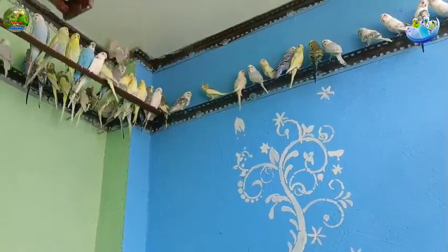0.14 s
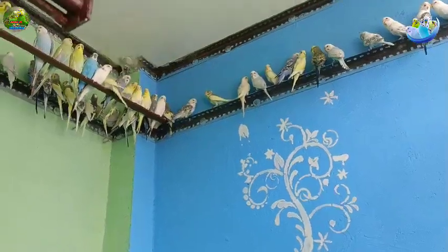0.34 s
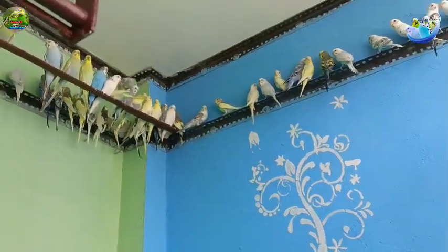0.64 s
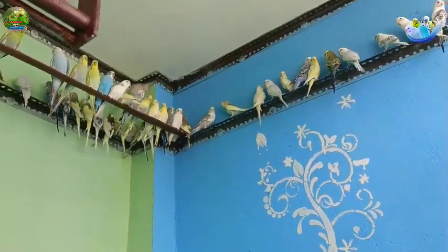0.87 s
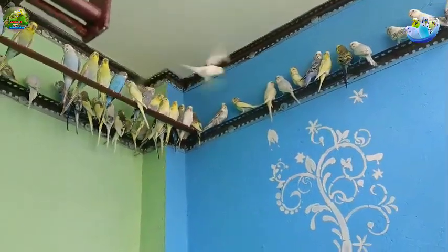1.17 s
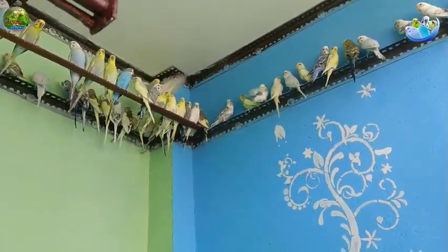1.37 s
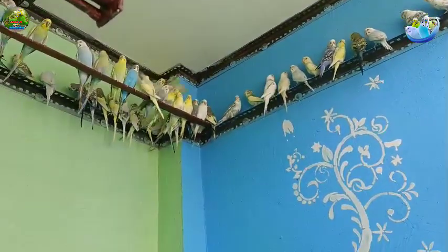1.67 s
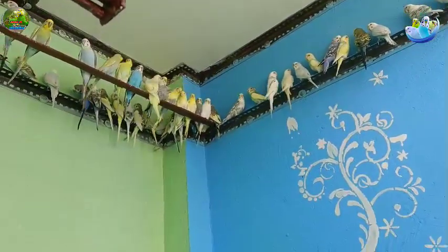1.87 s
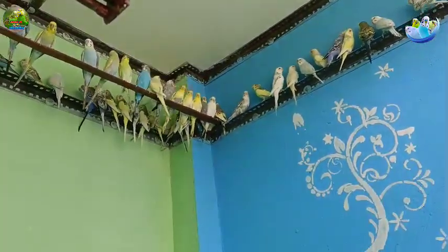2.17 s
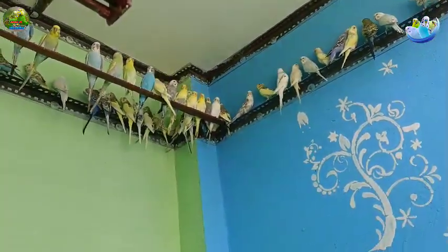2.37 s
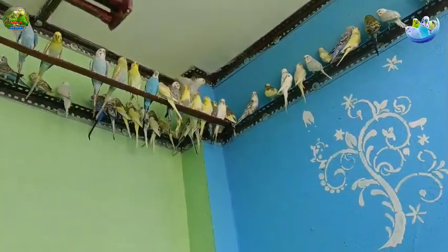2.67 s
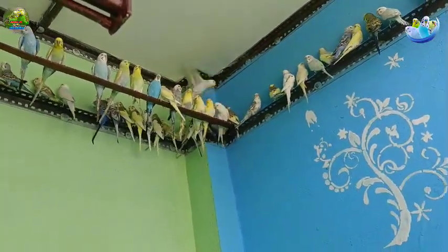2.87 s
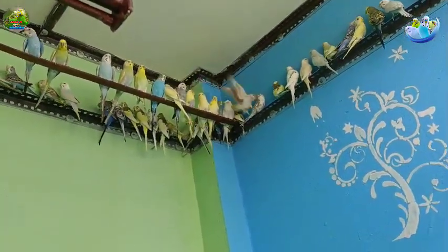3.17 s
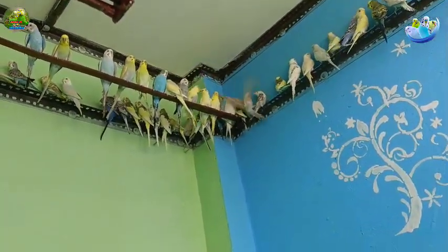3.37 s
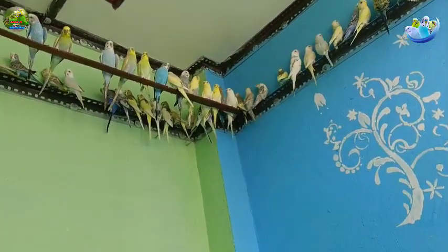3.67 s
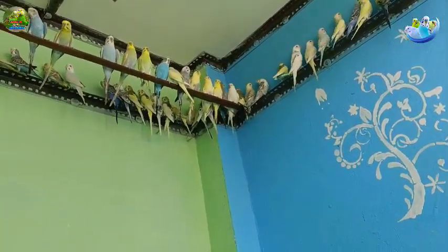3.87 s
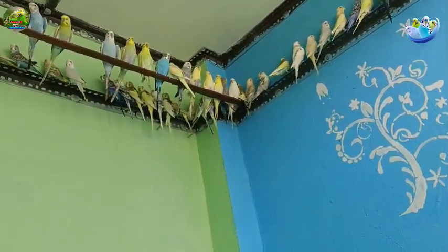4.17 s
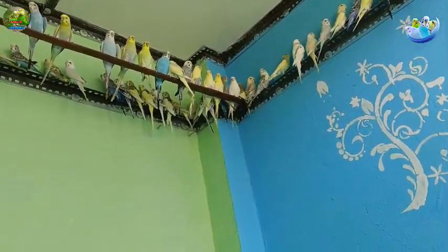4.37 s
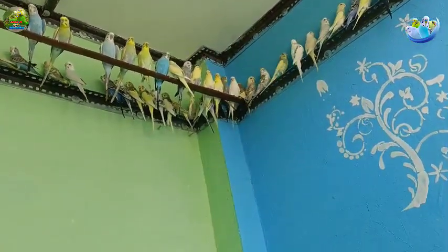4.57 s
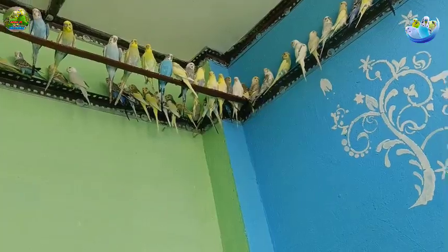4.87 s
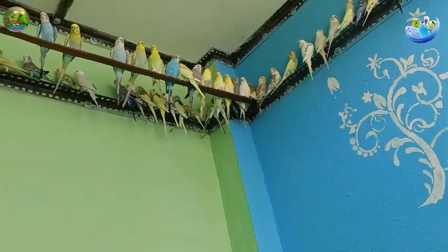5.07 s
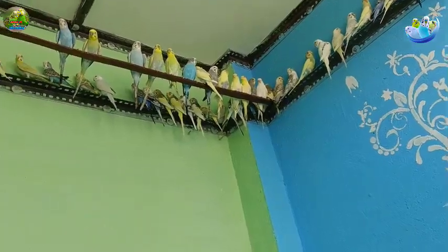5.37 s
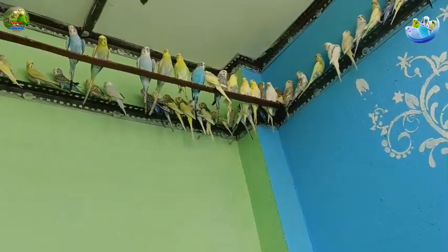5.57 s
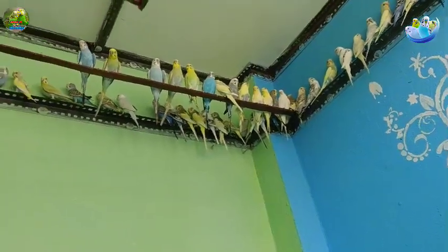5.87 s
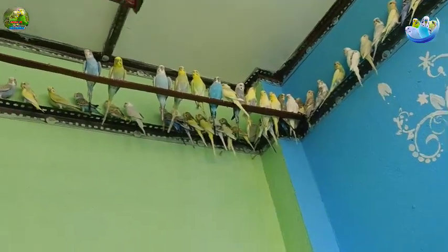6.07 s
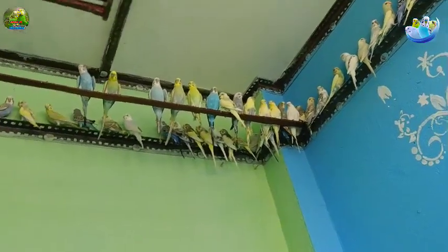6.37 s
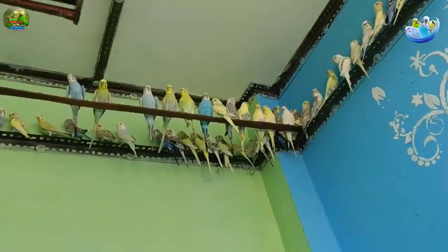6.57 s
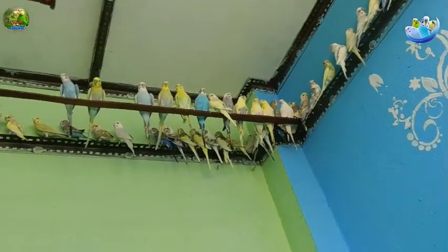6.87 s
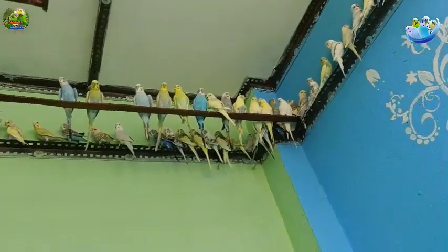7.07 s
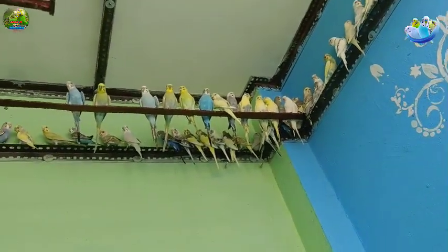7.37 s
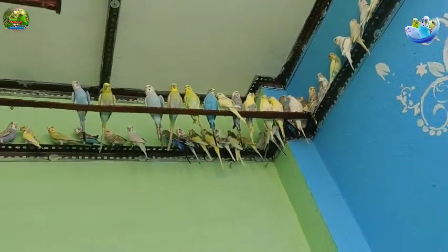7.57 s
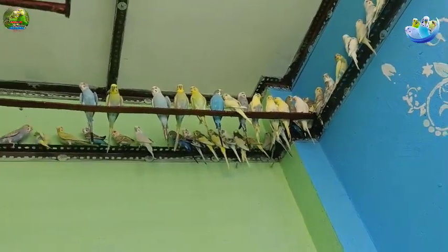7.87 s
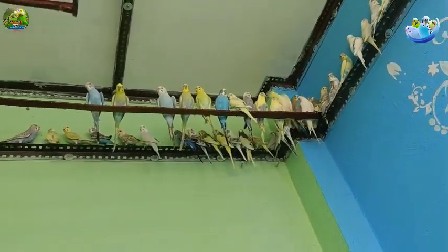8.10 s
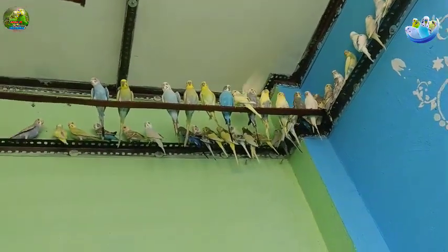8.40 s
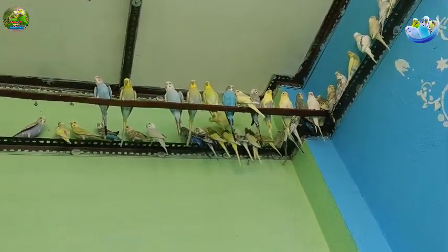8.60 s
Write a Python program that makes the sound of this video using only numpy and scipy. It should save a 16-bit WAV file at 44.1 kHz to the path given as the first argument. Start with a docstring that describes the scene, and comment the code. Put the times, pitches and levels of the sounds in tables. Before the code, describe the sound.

Over constant fan rush with a low wavering hum, a flock of small parrots chatters indoors. Quick raspy squawks and high peeps crowd the opening seconds, then fade into a short lull around four and a half seconds. Sweet but rough whistles, upward hooks and falling chirps follow, with brief squawks near the end. The stereo microphones are fairly close; plaster walls ring briefly around every call.

```python
"""A flock of budgerigars trades chirrups, falling chirps, warbles, hooks and peeps in a small plastered room.
Each whistle is a near sine, roughened by fast modulation of its frequency and amplitude.
Harsh squawks come in runs: uneven pulse trains filtered by a throat resonance.
Faint gliding notes follow many calls, and every call rings in the room.
Beneath lies a steady fan, shaped noise plus wavering tones, that hums on through a short lull."""
import sys
import numpy as np
from scipy import signal
from scipy.fft import rfft, irfft
from scipy.io import wavfile
from scipy.ndimage import uniform_filter1d, minimum_filter1d

SR = 44100
rng = np.random.default_rng(int(sys.argv[2]) if len(sys.argv) > 2 else 0)


def digitize_waveform(pressure):
    """Quantize a signal to 16-bit integers and store it at the path in sys.argv[1].

    Rows of a 2-D input are taken as channels; values are limited to [-1, 1].
    """
    field = np.atleast_2d(pressure).T
    bounded = np.clip(field, -1, 1)
    quanta = np.round(bounded * 32767).astype(np.int16)
    wavfile.write(sys.argv[1], SR, quanta)


N = 385434

# Levels in the tables are relative: gains follow. Roughness is a dimensionless modulation depth.
# Spectrum of the rushing air: f/Hz, spectral level/dB
AIR_SPECTRUM = [(30, -30), (100, -11.5), (150, -10.5), (240, 3), (320, -12), (400, -6), (500, -14.5),
                (650, -5.5), (1000, -12.5), (2300, -13), (4700, -18), (6500, -29.5), (12000, -29.5),
                (15500, -40)]
# Tones of the fan motor: f/Hz, level/dB
MOTOR_TONES = [(43.3, -56.5), (86.6, -53.5), (173.2, -43.5), (235, -53.5), (390, -50), (433, -52),
               (1083, -54.5)]
# Slow swell of the second motor tone: t/s, gain/dB
MOTOR_SWELL = [(0, -11), (3, -4.5), (4.5, 0.5), (6.3, -1), (6.7, 5.5), (7.6, 5.5), (8.7, 3)]
# Reverberation of the bare walls: f/Hz, T60/s
WALL_DECAY = [(1000, 0.12), (3000, 0.26), (6000, 0.22), (14000, 0.17)]
# Left-right balance of the calling birds: t/s, left minus right/dB
BALANCE = [(0.0, -2.5), (0.14, -4.5), (1.8, -0.5), (1.85, -3.5), (2.77, 1), (3.26, -3.5), (3.77, -1.0),
           (3.8, -4), (3.92, -3), (6.38, -1.5), (6.67, -4.5), (6.81, 3), (7.67, -2.5), (7.74, 0.5),
           (8.72, -2.5), (8.74, 0.0)]
# Throat response in a squawk: f/throat resonance (ratio), gain/dB
THROAT_RESPONSE = [(.25, -13.5), (.45, -3.5), (.62, 3), (.72, -3.5), (.83, 13), (1.05, 12), (1.28, 4),
                   (1.45, -8), (1.8, -13), (2.4, -16.5), (3.1, -24)]
# Second to fourth partials of a whistle, before roughness scales them: level/dB
PARTIALS_DB = [-27.5, -39.5, -31]
# Pitched squeals: t/s, level/dB, length/s, throat f/Hz, pitch f/Hz, roughness/1
SQUEALS = [(.898, -26, 0.016, 6530, 1750, 0.36), (2.545, -15.5, 0.063, 5580, 1584, 0.32),
           (2.620, -15.5, 0.041, 5360, 1480, 0.3), (2.696, -8.5, 0.019, 5470, 1485, 0.34),
           (3.765, -34, .1, 6630, 1800, 0.3), (5.315, -32, 0.021, 4080, 1523, 0.23),
           (8.178, -29, 0.015, 5170, 1850, 0.34)]
# Bouts of evenly paced squawks: t/s, bout length/s, rate/(1/s), first level/dB, last level/dB,
# central squawk length/s, central throat f/Hz
SQUAWK_BOUTS = [(0, .03, 14, -21.5, -23, 0.0079, 5150), (0.201, .03, 14, -35, -33.5, 0.02, 4800),
                (0.628, .03, 14, -29, -31.5, 0.014, 4600), (0.962, .12, 13.7, -25, -24.5, 0.03, 5230),
                (1.226, .18, 13.5, -20, -19.5, 0.033, 5040), (1.51, .36, 15.5, -26, -21, 0.036, 4730),
                (1.898, .25, 13.8, -18, -23.5, 0.06, 4830), (2.215, .3, 11.3, -18.5, -21.5, .025, 4470),
                (2.76, .15, 16.3, -15, -15, 0.026, 4980), (2.945, .15, 17.5, -18, -15.5, .042, 4900),
                (3.123, .16, 15.3, -18, -23.5, .036, 4920), (3.289, .03, 14, -28, -23, 0.022, 4540),
                (3.311, .16, 16.4, -14.5, -24.5, 0.023, 5040), (3.509, .08, 20, -15, -21, .045, 5150),
                (3.654, .03, 12.6, -18.5, -20.5, 0.058, 4400), (4.693, .03, 14, -42, -42, 0.036, 4070),
                (5.021, .03, 14, -32.5, -34, 0.0345, 4000), (5.153, .03, 14, -41, -41, 0.0247, 4200),
                (7.943, .03, 14, -28.5, -28, 0.023, 4660), (8.012, .12, 11.2, -25, -34, 0.018, 4600),
                (8.429, .17, 15.5, -25, -23.5, 0.018, 5070)]
# Lone upward hooks: t/s, length/s, level/dB, lowest f/Hz
HOOKS = [(1.01, 0.04, -16, 3456), (1.144, 0.045, -28, 2430), (1.206, 0.032, -29.5, 2014),
         (1.419, 0.042, -17, 2380), (1.471, 0.019, -16.5, 2373), (1.707, 0.0305, -19.5, 2573),
         (3.886, 0.11, -32, 2340), (5.441, 0.075, -19, 2740), (5.645, 0.052, -17, 2510),
         (5.84, 0.038, -20.5, 2410), (6.105, 0.047, -21.5, 2433), (7.658, 0.05, -23.5, 2133),
         (8.411, 0.043, -16, 2380)]
# Gliding peeps: t/s, length/s, level/dB, middle f/Hz, fall to either side/middle f (ratio; negative rises)
PEEPS = [(0.509, 0.024, -21.5, 4153, -0.012), (0.89, 0.029, -22, 3496, 0.025),
         (1.065, 0.059, -17.5, 3234, 0.01), (1.268, 0.061, -18.5, 3414, 0.095),
         (1.53, 0.087, -19, 3314, 0.084), (1.624, 0.066, -19, 3070, -0.0057),
         (1.746, 0.044, -10.5, 3587, 0.023), (1.803, 0.034, -14, 3600, -.05),
         (2.035, 0.13, -24, 3050, 0.038), (2.826, 0.032, -11.5, 3213, .02), (3.736, .056, -18, 3160, 0.057),
         (3.795, 0.089, -15, 3240, -0.014), (4.777, 0.038, -34, 3150, 0.26),
         (4.996, 0.024, -28.5, 2420, 0.075), (5.001, 0.054, -32, 4680, 0.087),
         (5.385, 0.02, -16, 3895, -0.0033), (5.403, 0.026, -13, 3236, 0.037),
         (5.694, 0.044, -15.5, 3200, 0.18), (5.738, 0.05, -14.5, 3434, 0.013),
         (5.775, 0.019, -10.5, 3093, -0.0056), (5.82, 0.017, -26.5, 4600, -0.011),
         (6.014, 0.057, -19, 2970, 0.042), (6.06, 0.031, -20.5, 3490, 0.033),
         (7.067, 0.054, -33, 2950, -0.01), (7.399, 0.015, -19, 3150, 0.024),
         (7.411, .016, -13.5, 3670, 0.067), (7.529, 0.042, -17.5, 3800, 0.13),
         (7.594, 0.033, -15.5, 3570, .04), (8.207, 0.02, -9, 4045, -0.05),
         (8.346, 0.027, -15.5, 2355, 0.022), (8.464, 0.021, -9.5, 3590, 0.041),
         (8.497, 0.039, -10, 3420, -0.061)]
# Warbles, zigzags that step down: t/s, level/dB, starting f/Hz, roughness/1
WARBLES = [(.28, -30.5, 3537, 0.14), (1.333, -27, 3927, 0.77), (2.323, -26.5, 3692, .35)]
# Falling chirps: t/s, length/s, level/dB, top f/Hz, resting f/Hz, roughness/1
FALLS = [(0.539, 0.085, -25, 3720, 3210, 0.77), (0.949, 0.11, -18, 4240, 3163, 0.36),
         (2.737, 0.093, -13.5, 3792, 3430, .3), (3.609, 0.11, -16.5, 4290, 3230, 0.47),
         (3.98, 0.12, -26.5, 4230, 3237, 0.58), (5.531, 0.12, -20.5, 4470, 3370, .5),
         (6.136, 0.12, -14, 4270, 3122, 0.68), (6.697, 0.12, -15, 4545, 3286, 0.53),
         (7.694, 0.13, -13, 4270, 3263, 0.39), (8.236, .15, -13.5, 3770, 3366, 0.41)]
# Chirrups, two upward hooks with a buzz between: t/s, level/dB, lowest f of the first hook/Hz, roughness/1
CHIRRUPS = [(3.325, -24, 2420, 0.88), (5.901, -19, 2610, 1), (6.487, -18, 2590, 0.76),
            (6.947, -17.5, 2749, 0.83), (7.153, -18.5, 2757, 0.75), (7.435, -17.5, 2726, 0.51),
            (7.956, -15.5, 2747, 0.26), (8.603, -18.5, 2650, 0.65)]

AIR_DB = -33
ROUGH_PER_S = 8.33  # the longer a lone note is held, the rougher it gets
LEAD_S, LOOP_UP_S, LOOP_DOWN_S = .038, .035, .016  # parts of a warble
LOOP_STEP = .88  # each warbled loop is lower by this factor
DROP_S, THROB_S = .02, .04  # time scale of a pitch drop; period of the throb
HOOK_S, HOLD_S, BUZZ_S, SECOND_HOOK_S = .023, .018, .027, .026  # parts of a chirrup
EDGE_HZ = 15500  # upper band limit


def amp(db):
    """Level: decibels to amplitude ratio."""
    return 10 ** (np.asarray(db) / 20)


def evened(x):
    """Normalisation: scales to an rms of one."""
    return x / np.sqrt(np.mean(x ** 2) + 1e-20)


def read(points, at):
    """Interpolation along a logarithmic axis."""
    key, value = np.transpose(points)
    return np.interp(np.log(at + 1e-6), np.log(key), value)


def add(mix, s, sound):
    """Superposition: adds a stereo sound to the mix at time s."""
    part = mix[:, max(round(s * SR), 0):][:, :sound.shape[1]]
    part += sound[:, :part.shape[1]]


def tremble(n, rate_hz, size=16384):
    """Low-pass noise: smooth random motion up to about rate_hz, of rms one before it is cut to n."""
    size = max(size, n)
    hz = np.fft.rfftfreq(size, 1 / SR)
    spectrum = rfft(rng.standard_normal(size)) / (1 + (hz / rate_hz) ** 4)
    return evened(irfft(spectrum, size))[:n]


def bearing(s):
    """Level difference: left-right balance in dB of the flock at time s."""
    return np.interp(s, *np.transpose(BALANCE))


def room(call, balance_db, wet_db, near_db, lead_s=.00038, size=14336):
    """Convolution with an impulse response: direct sound, five early reflections, a dense decaying tail."""
    t, hz = np.arange(size) / SR, np.fft.rfftfreq(size, 1 / SR)
    noise = rfft(rng.standard_normal((2, size)))
    centres = [f for f, _ in WALL_DECAY]
    tail = 0
    for band, (_, t60) in zip(np.eye(len(WALL_DECAY)), WALL_DECAY):
        tail = tail + irfft(noise * np.interp(hz, centres, band)) * amp(-60 * t / t60)
    tail *= np.clip((t - .003) / .0037, 0, 1)
    path = amp(wet_db) * tail / np.linalg.norm(tail[0])
    path[0, 0] += 1
    path[1, round(abs(lead_s) * SR)] += 1  # the left microphone is a little nearer
    for delay, skew in rng.random(size=(5, 2)):
        at = round((.000983 + .013 * delay) * SR)
        path[0, at + 20] += amp(near_db) * (1 - .087 * delay)
        path[1, at + int(40 * skew)] += amp(near_db) * (1 - .6 * delay)
    heard = signal.fftconvolve(call[None], path, axes=1)
    # each channel keeps the energy of the call
    heard *= np.linalg.norm(call) / np.linalg.norm(heard, axis=1, keepdims=True)
    return heard * amp([[balance_db / 2], [-balance_db / 2]])


def whistle(hz, level_db, rough, swing=.09, buzz_hz=400., flutter=.4, rasp_db=-19.):
    """Modulation: the syrinx sings a near sine; fast flutter of pitch and strength makes it buzz."""
    n = len(hz)
    buzz_turns = np.cumsum(buzz_hz * (1 + .392 * tremble(n, 114.3))) / SR
    buzz = np.sin(2 * np.pi * buzz_turns) + .54 * np.tanh(tremble(n, buzz_hz))
    phase = 2 * np.pi * np.cumsum(hz * (1 + swing * rough * buzz)) / SR
    overtones = sum(amp(db) * np.sin((k + 2) * phase) for k, db in enumerate(PARTIALS_DB))
    tone = np.sin(phase) + (1 + rough) / 2 * overtones
    # alternate cycles differ when the voice is pressed
    tone += amp(rasp_db) * rough * np.sin(phase) * np.cos(phase / 2) * 2
    tone *= np.exp(flutter * rough * np.tanh(tremble(n, buzz_hz)))
    edge_s = np.minimum(np.arange(n), np.arange(n)[::-1]) / SR
    fade = np.sin(np.pi / 2 * np.minimum(edge_s / .002, 1)) ** 2
    return evened(tone * amp(level_db) * fade)


def hook(length, low_hz, rise, swell_db, rough, dip=.25, curl=2.):
    """Frequency sweep: lingers low, then climbs with a given swell; rows of pitch, level, roughness."""
    u = np.linspace(0, 1, round(length * SR))
    hz = low_hz * (1 + rise * abs((u - dip) / (1 - dip)) ** curl)
    return np.array([hz, swell_db * (u - .5), np.full_like(u, rough)])


def slide(length, first_hz, last_hz, first_db, last_db, rough):
    """Linear glide: rows of pitch, level and roughness."""
    return np.linspace([first_hz, first_db, rough], [last_hz, last_db, rough], round(length * SR)).T


def sing(syllables, db, balance_db, wander=.0313, wander_hz=79., wet_db=-1.5, near_db=-5.5):
    """Phase continuity: syllables join in one breath, rough ones wander in pitch; the room answers."""
    hz, level_db, rough = uniform_filter1d(np.hstack(syllables), size=160, axis=1)
    wandering_hz = hz * (1 + (.015 + wander * rough) * tremble(len(hz), wander_hz))
    voice = whistle(wandering_hz, level_db, rough)
    return room(amp(db) * voice, balance_db, wet_db, near_db)


def fan(air_db=-1., hum_db=0., waver_hz=.492, alike_hz=640.):
    """Coherence: rushing air, most alike at both microphones in the bass, under wavering motor tones."""
    hz = np.fft.rfftfreq(N, 1 / SR)
    left, other = rfft(rng.standard_normal((2, N))) * amp(read(AIR_SPECTRUM, hz))
    same = .96 * np.sinc(hz / alike_hz / 2) / (1 + (hz / 4000) ** 2)
    right = same * left + np.sqrt(1 - same ** 2) * other
    air = evened(irfft(np.array([left, right]), N))
    t, drift = np.arange(N) / SR, np.cumsum(tremble(N, 3.23)) / SR
    swell_db = np.interp(t, *np.transpose(MOTOR_SWELL))
    hum = 0
    for k, (f, db) in enumerate(MOTOR_TONES):
        # the waver grows with frequency; waver_hz is its rms at the third tone
        turns = f * t + waver_hz * f / MOTOR_TONES[2][0] * drift + rng.random()
        hum = hum + amp(db + swell_db * (k == 1)) * np.sqrt(2) * np.sin(2 * np.pi * turns)
    return amp(AIR_DB + air_db) * air + amp(hum_db) * hum


def muttering(below_db=-15.):
    """Reverberant distance: farther birds add faint glides just after hooks, peeps, falls and chirrups."""
    out = np.zeros((2, N))
    # falls and chirrups each draw two replies
    cues = [(s, db) for s, _, db, *_ in [*HOOKS, *PEEPS, *FALLS, *FALLS]]
    cues += [(s, db) for s, db, *_ in 2 * list(CHIRRUPS)]
    for (s, db), (wait, length, pitch, bend) in zip(cues, rng.random(size=(len(cues), 4))):
        u = np.linspace(-1, 1, round((.015 + .03 * length) * SR))
        hz = (1700 + 3400 * pitch) * (1 + .4 * (bend - .5) * u)
        voice = whistle(hz, -6 * u ** 2, .4)
        add(out, s + .06 * wait, room(amp(db + below_db) * voice, 0, wet_db=4., near_db=-7.))
    return out


def squawk(length, throat_hz, pitch, rough, arch=.2, jitter=.05, rattle_hz=330., size=8192):
    """Source and filter: pressed membranes slap in uneven pulses on an arched pitch and ring the throat."""
    u = np.linspace(0, 1, min(round(length * SR), size))
    n = len(u)
    arched_hz = pitch * (1 - arch * np.exp(-u / .1385) - .1114 * u ** 4)
    turns = np.cumsum(arched_hz * (1 + jitter * rough * tremble(n, 344))) / SR
    pulses = evened(sum(np.cos(2 * np.pi * k * turns) for k in range(1, 11)))
    hiss = .35 * rng.standard_normal(size)[:n] * (1 + np.cos(2 * np.pi * turns))
    drive = pulses * (1 + rough * np.cos(np.pi * turns)) + rough * hiss  # alternate pulses differ
    rattle = np.sin(2 * np.pi * np.cumsum(rattle_hz * (1 + .298 * tremble(n, 93))) / SR)
    drive *= signal.windows.tukey(n, .22) * np.exp(rough * (.6 * rattle + .4 * tremble(n, 150)))
    colour = amp(read(THROAT_RESPONSE, np.fft.rfftfreq(size, 1 / SR) / throat_hz))
    return evened(irfft(rfft(drive, size) * colour)[:n])


def bout(start, span, rate, first_db, last_db, length, throat_hz, pitch_hz=1389., rough=.624,
         pitch_spread=.1, throat_spread=.067, length_spread=.11, rough_spread=.38):
    """Periodic repetition: steady squawks, each with its own length, throat, pitch and harshness."""
    times = start + np.arange(0, span, 1 / rate)
    levels_db = np.linspace(first_db, last_db, len(times))
    spreads = [length_spread, throat_spread, pitch_spread, rough_spread]
    scatter = np.exp(spreads * rng.uniform(-1.5, 1.5, (len(times), 4)))
    voices = [length, throat_hz, pitch_hz, rough] * scatter
    return [(s, db, *voice) for s, db, voice in zip(times, levels_db, voices)]


def scolding(gain_db=6.):
    """Pulse excitation: single squeals and quick runs of squawks ring in the room."""
    out = np.zeros((2, N))
    squawks = [call for row in SQUAWK_BOUTS for call in bout(*row)]
    for s, db, *voice in [*SQUEALS, *squawks]:
        call = amp(db + gain_db) * squawk(*voice)
        add(out, s, room(call, bearing(s), wet_db=-1., near_db=-6.))
    return out


def lone_notes(hook_gain_db=2.5, peep_gain_db=2.5, rise=.27):
    """Frequency glides: single upward hooks, and peeps that slide in pitch."""
    out = np.zeros((2, N))
    for s, length, db, hz in HOOKS:
        note = hook(length, hz, rise, swell_db=0., rough=ROUGH_PER_S * length, dip=.117)
        add(out, s, sing([note], db + hook_gain_db, bearing(s)))
    for s, length, db, hz, sag in PEEPS:
        note = slide(length, hz * (1 + sag), hz * (1 - sag), first_db=13., last_db=11.,
                     rough=ROUGH_PER_S * length)
        add(out, s, sing([note], db + peep_gain_db, bearing(s), wander=.057))
    return out


def warbles(gain_db=10.5, lead_sag=.85, first_loop=.72, rise=.31, loop_db=-3.5, count=3):
    """Zigzag modulation: a falling lead-in, then loops that sweep up and slip down, ever lower and softer."""
    out = np.zeros((2, N))
    for s, db, hz, rough in WARBLES:
        syllables = [slide(LEAD_S, hz, hz * lead_sag, first_db=-5., last_db=0., rough=rough)]
        for k in range(count):
            low_hz = hz * first_loop * LOOP_STEP ** k
            up = hook(LOOP_UP_S, low_hz, rise, swell_db=3.5, rough=rough, dip=.142)
            up = up + [[0], [loop_db * k], [0]]
            down = slide(LOOP_DOWN_S, low_hz * (1 + rise), low_hz * LOOP_STEP,
                         first_db=6., last_db=-18., rough=rough)
            syllables += [up, down]
        add(out, s, sing(syllables, db + gain_db, bearing(s)))
    return out


def falls(gain_db=5.5, accent_db=5.5, last_note_db=4.5, quaver=.07, rough_swing=.88, start_rough=.2):
    """Pitch relaxation: an accented start drops to a throb, rough when high, clean when low; the end swells."""
    out = np.zeros((2, N))
    for s, length, db, top_hz, rest_hz, rough in FALLS:
        t = np.arange(0, length, 1 / SR)
        high = np.exp(-(t / DROP_S) ** 2)
        throb = -np.cos(2 * np.pi * t / THROB_S)
        hz = high * top_hz + (1 - high) * rest_hz * (1 + quaver * throb)
        level_db = accent_db * high + last_note_db * (t / length) ** 8
        roughness = rough * (1 + rough_swing * throb) + start_rough * high
        add(out, s, sing([np.array([hz, level_db, roughness])], db + gain_db, bearing(s)))
    return out


def chirrups(gain_db=5.5, rise=.44, buzz_sag=.86, second_pitch=.92, second_rise=.49,
             hook_rough=.3, hold_rough=.36, buzz_rough=1.5):
    """Onset of roughness: a cleaner hook leaps to a held top that breaks into a buzz; a lower hook follows."""
    out = np.zeros((2, N))
    for s, db, hz, rough in CHIRRUPS:
        top_hz = hz * (1 + rise)
        first = hook(HOOK_S, hz, rise, swell_db=10., rough=hook_rough * rough, dip=.3, curl=2.5)
        hold = slide(HOLD_S, top_hz, top_hz, first_db=9.5, last_db=-2.5, rough=hold_rough * rough)
        buzz = slide(BUZZ_S, top_hz, top_hz * buzz_sag, first_db=-4., last_db=-10.5,
                     rough=buzz_rough * rough)
        second = hook(SECOND_HOOK_S, hz * second_pitch, second_rise, swell_db=19.5,
                      rough=hook_rough * rough, dip=.019, curl=1.7)
        add(out, s, sing([first, hold, buzz, second], db + gain_db, bearing(s)))
    return out


def scene():
    """Superposition: the whole flock over the fan."""
    background = fan() + muttering()
    return background + scolding() + lone_notes() + warbles() + falls() + chirrups()


def record(dry, threshold_db=-10.5, squeeze=.96, recovery_db=11., gain_db=2.):
    """Compression: gain control holds loud calls down, a limiter catches peaks, a low-pass limits the band."""
    power_db = 10 * np.log10(abs(uniform_filter1d((dry ** 2).mean(0), size=400)) + 1e-12)
    fall = np.arange(N) * recovery_db / SR  # the held level falls by recovery_db each second
    held_db = np.maximum.accumulate(power_db + fall) - fall
    over_db = np.maximum(held_db - threshold_db, 0)
    held = dry * amp(gain_db - squeeze * uniform_filter1d(over_db, size=200))
    headroom = minimum_filter1d(.95 / np.maximum(abs(held).max(0), .95), size=241)
    limited = held * uniform_filter1d(headroom, size=201)
    low_pass = signal.firwin(511, EDGE_HZ, window=("kaiser", 9), fs=SR)
    return signal.oaconvolve(limited, low_pass[None], "same")


dry = scene()
out = record(dry)
digitize_waveform(out)
```